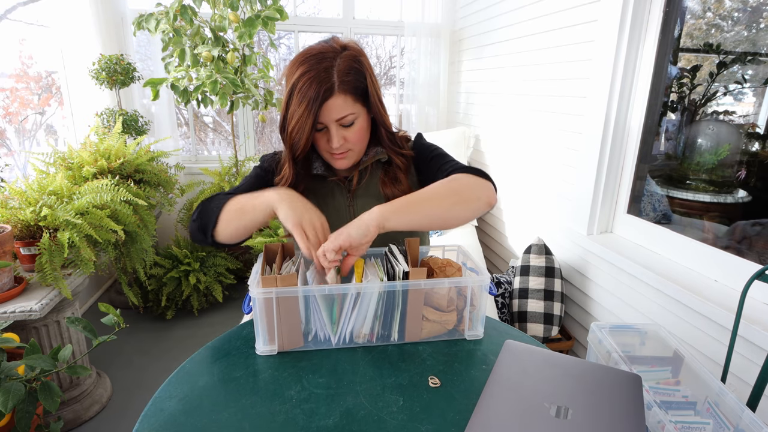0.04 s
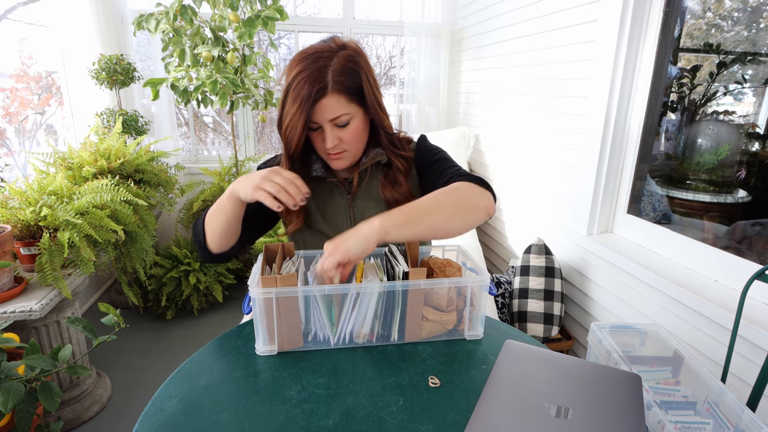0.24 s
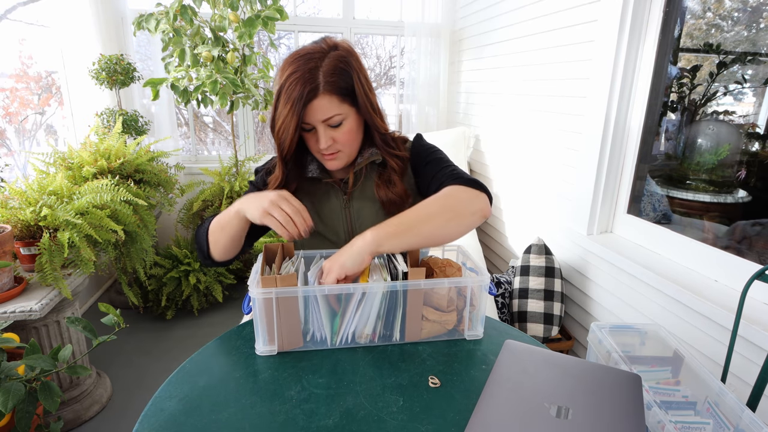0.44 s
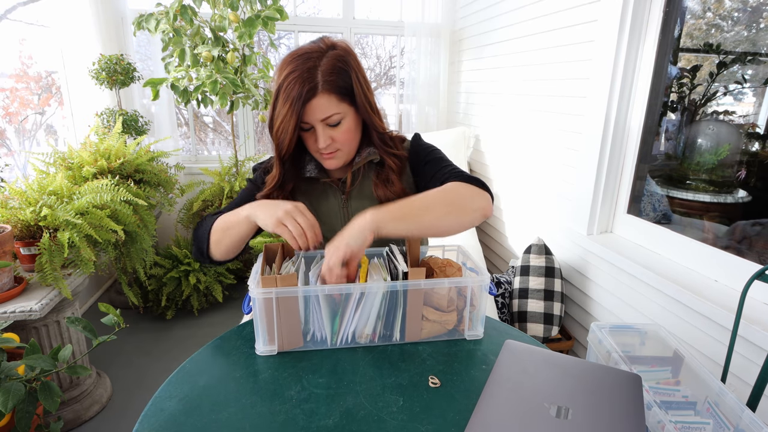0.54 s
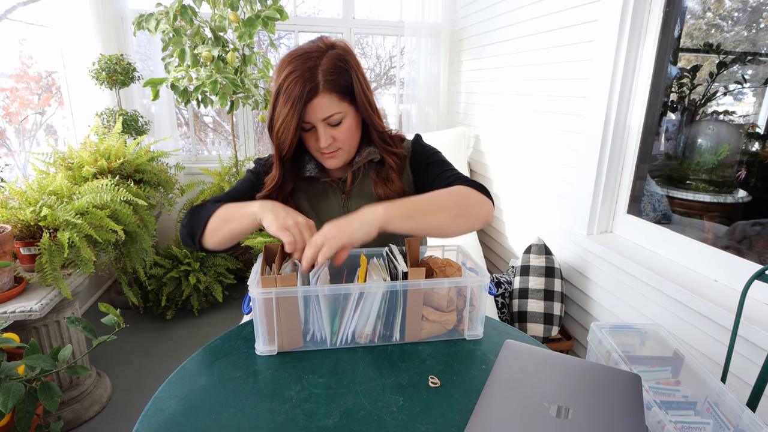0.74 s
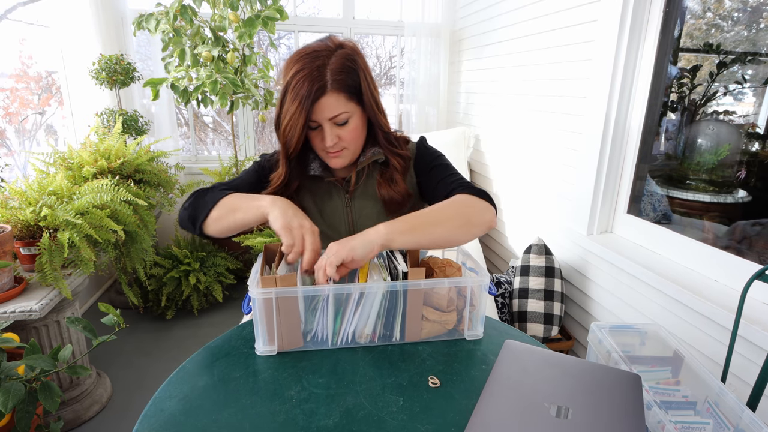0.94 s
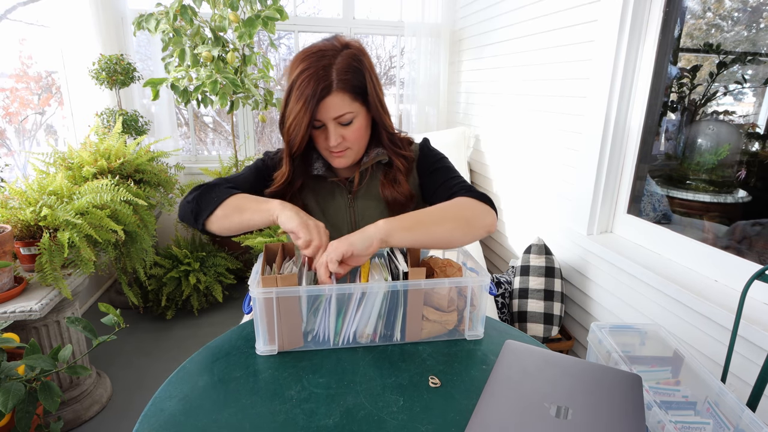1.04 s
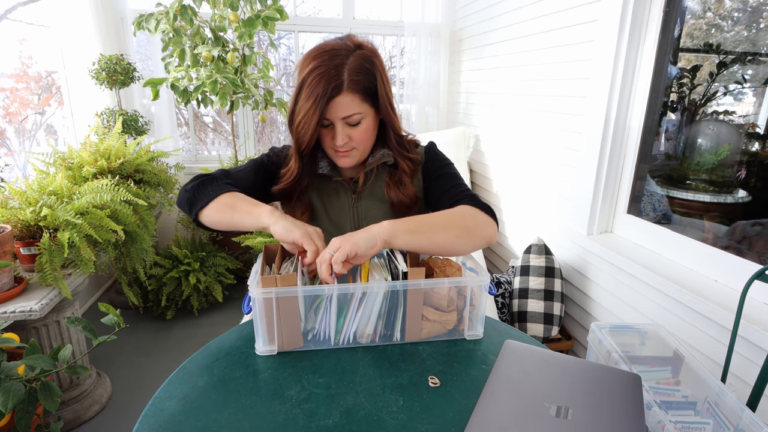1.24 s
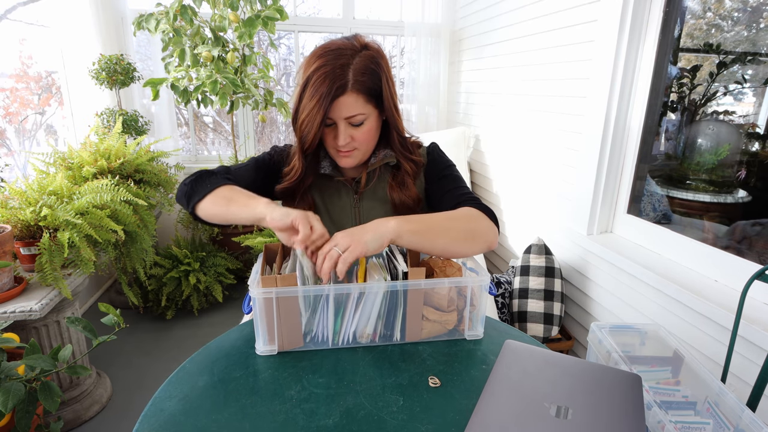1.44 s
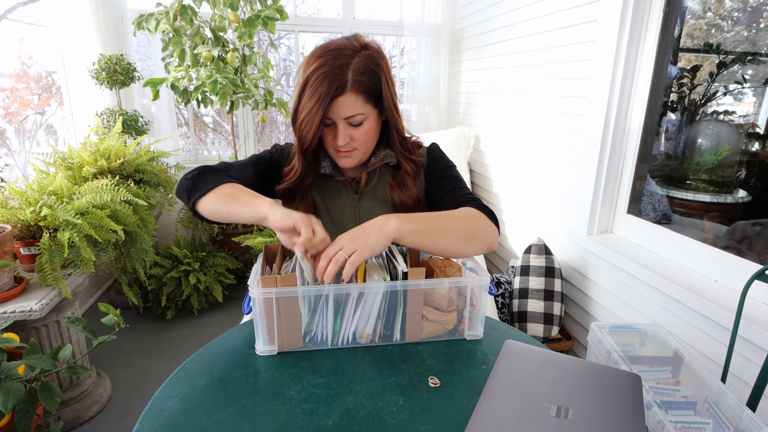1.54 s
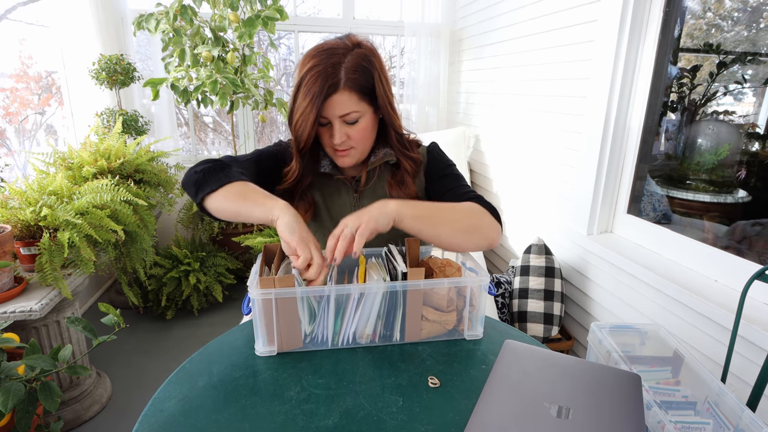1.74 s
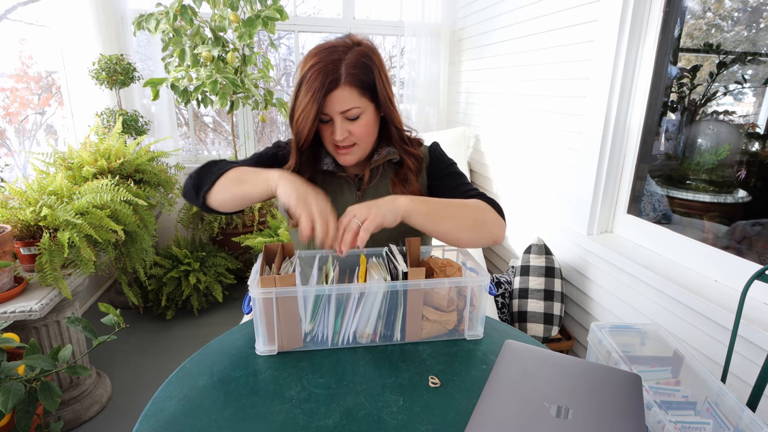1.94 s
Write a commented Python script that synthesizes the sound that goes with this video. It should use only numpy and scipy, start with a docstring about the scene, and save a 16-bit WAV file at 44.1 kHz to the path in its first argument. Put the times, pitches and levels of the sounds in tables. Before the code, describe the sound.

Paper seed packets rustle and tick as they are flicked through in a hollow plastic box

```python
"""Seed packets in a plastic box

Paper seed packets are shuffled and slid into a plastic storage box on a table in a small, bright room.
Packet edges snap past each other with dry ticks: a noise crack over damped edge and face tones.
Faces scrape in short strokes of unevenly gripped noise, and now and then one chatters at a resonance.
Packets bump the hollow box, which answers with a low, quickly damped knock; soft thuds reach the table.
A short room echo and quiet air lie behind it all."""
import sys
import numpy as np
from scipy import signal
from scipy.fft import rfft, irfft
from scipy.io import wavfile

SR = 44100
rng = np.random.default_rng(int(sys.argv[2]) if len(sys.argv) > 2 else 0)


def master(y):
    """Save y as 16-bit WAV."""
    cut = np.clip(np.atleast_2d(y).T, -1, 1)
    pcm = np.round(cut * 32767)  # scale
    wavfile.write(sys.argv[1], SR, pcm.astype(np.int16))


N = 88200  # two seconds of samples
HIT_SAMPLES = 4096  # length of one tick or knock

# Room: levels in dB, decays to -60 dB in seconds
AIR_DB = -55.5
ROOM_DB, ROOM_T60_S, ROOM_BUILD_S = -9.5, 0.4, 0.015
ROOM_TREBLE_DB, ROOM_TREBLE_T60_S, ROOM_SPLIT_HZ = -5.5, 0.15, 3400
TOP_HZ = 16000  # upper limit of the recorder

# Knocks: box walls and slap are in dB relative to the bump
KNOCK_T60_S, KNOCK_ATTACK_S, BOX_DB = 0.019, 0.00079, -7.5
SLAP_DB, SLAP_T60_S = -10, 0.013
# The bass cut sits at KNOCK_LOW_HZ for the reference pitch and moves with this power of the pitch
KNOCK_LOW_HZ, KNOCK_REFERENCE_HZ, KNOCK_LOW_LAW = 223, 500, 2.5

# Paper friction: catches over a smooth drag (share of the mean power), trims of each layer, grit in the hiss
CATCHES_PER_S, CATCH_SPREAD_DB, CATCH_LIMIT = 700, 5.5, 2.8
CATCH_S, SMOOTH_SHARE = 0.0019, 0.52
HISS_DB, RASP_DB, RUMBLE_DB = 1, 2, 0
GRIT_PER_S, GRIT_DB = 1900, -18

# Ticks
FLEX_T60_S, EDGE_T60_S, CRACK_T60_S = 0.0074, 0.0053, 0.012
FLEX_ATTACK_S, TICK_ATTACK_S, CRACK_HOLD_S = 0.00081, 0.000078, 0.00033


def undb(db):
    """Decibels to gain."""
    return 10 ** (np.asarray(db) / 20)


def unit(x):
    """Scale to an rms of one."""
    return x / np.sqrt(np.mean(x ** 2))


def burst(x, db):
    """Scale a short sound to the energy of one millisecond at the given rms level."""
    return x * undb(db) * np.sqrt(SR / 1000 / np.sum(x ** 2))


def fade(t60, size=HIT_SAMPLES):
    """Exponential decay that falls 60 dB in t60 seconds."""
    return np.exp(-np.log(1000) * np.arange(size) / SR / t60)


def onset(seconds, size=HIT_SAMPLES):
    """Exponential approach to one with the given time constant."""
    return 1 - np.exp(-np.arange(size) / SR / seconds)


def swell(peak, rise, fall):
    """A bell-shaped rise and fall around a moment, each side with its own width."""
    t = np.arange(N) / SR - peak
    return np.exp(-np.minimum((t / np.where(t < 0, rise, fall)) ** 2, 20))


def ring(hz, t60):
    """One damped mode."""
    return np.sin(2 * np.pi * hz * np.arange(HIT_SAMPLES) / SR) * fade(t60)


def coloured(x, colour):
    """Filter by a curve through (Hz, dB) points on a log-frequency axis, then set the rms to one."""
    hz, db = np.array(colour).T
    f = np.maximum(np.arange(len(x) // 2 + 1) * SR / len(x), 1)
    gain = undb(np.interp(np.log(f), np.log(hz), db))
    return unit(irfft(rfft(x) * gain, len(x)))


def noise(colour, size=N):
    """Coloured noise."""
    return coloured(rng.standard_normal(size), colour)


def add(out, start, x):
    """Mix a sound in at a time in seconds."""
    i = int(start * SR)
    out[i:i + len(x)] += x[:N - i]


def room_air():
    """The quiet air of the room: steady noise, strongest in the bass."""
    # spectrum of the air: frequency_hz, relative level_db
    air_colour = [(20, 5), (45, -8), (100, -2), (200, -3.5), (500, -11.5), (900, -14), (2000, -14.5),
                  (5000, -21.5), (16000, -28)]
    return undb(AIR_DB) * noise(air_colour)


def room(x):
    """Short diffuse echo of hard walls; the treble dies first."""
    scatter = rng.standard_normal(N)
    decay = fade(ROOM_T60_S, size=N)
    low = signal.sosfilt(signal.butter(1, ROOM_SPLIT_HZ, fs=SR, output="sos"), scatter)
    treble = undb(ROOM_TREBLE_DB) * (scatter - low) * fade(ROOM_TREBLE_T60_S, size=N)
    tail = onset(ROOM_BUILD_S, size=N) * (low * decay + treble)
    return undb(ROOM_DB) * signal.fftconvolve(x, tail)[:N] / np.sqrt(np.sum(decay ** 2))


def thuds():
    """Hands press the box against the table: low noise in soft swells."""
    # presses of the box on the table: peak_s, length_s, level_db
    presses = [(0.211, 0.0081, -34), (0.398, 0.061, -48.5), (0.906, 0.05, -56), (1.37, 0.024, -49),
               (1.783, 0.023, -51.5), (1.881, 0.049, -45.5)]
    # spectrum of a thud: frequency_hz, relative level_db
    thud_colour = [(25, -9), (45, -19), (90, -4), (170, 3), (260, -6.5), (500, -39), (1000, -64)]
    pressure = sum(undb(db) * swell(peak, length / 2, length / 2) for peak, length, db in presses)
    return noise(thud_colour) * pressure


def knocks():
    """A packet lands with a papery slap and a few low cycles, and rings the walls; low bumps keep more bass."""
    # packets bumping the box: start_s, level_db (energy in 1 ms, ahead of the bass cut), pitch_hz
    bumps = [(0.0633, -27.5, 450), (0.2074, -24, 389), (0.343, -12, 462), (0.371, -50, 460),
             (0.394, -24.5, 468), (0.406, -22, 410), (0.573, -29.5, 420), (0.732, -29, 510),
             (0.85, -24, 315), (0.901, -21, 433), (0.938, -26.5, 533), (1.167, -27, 467),
             (1.2925, -30, 465), (1.4304, -19, 376), (1.451, -22, 462), (1.5072, -7, 485),
             (1.704, -26, 343), (1.747, -23.5, 362), (1.756, -37, 350), (1.767, -25, 395),
             (1.867, -24, 388), (1.889, -24.5, 430), (1.981, -26, 455), (1.9952, -12, 509)]
    # ringing of the plastic box walls: frequency_hz, relative level_db, t60_s
    box_modes = [(309, 4, 0.059), (384, -12.5, 0.042), (527.5, -2, 0.085), (662, -4.5, 0.074),
                 (1069, -13, 0.12), (1660, -7, 0.022)]
    # spectrum of the papery slap: frequency_hz, relative level_db
    slap_colour = [(300, -2), (750, -22), (1050, -8), (1700, -11), (2600, -40), (6000, -27), (16000, -40)]
    out = np.zeros(N)
    walls = sum(undb(db) * ring(hz, t60) for hz, db, t60 in box_modes)
    for start, db, hz in bumps:
        bump = onset(KNOCK_ATTACK_S) * ring(hz, KNOCK_T60_S)
        slap = noise(slap_colour, size=HIT_SAMPLES) * fade(SLAP_T60_S)
        mix = unit(bump) + undb(BOX_DB) * unit(walls) + undb(SLAP_DB) * unit(slap)
        cut_hz = KNOCK_LOW_HZ * (hz / KNOCK_REFERENCE_HZ) ** KNOCK_LOW_LAW
        bass_cut = signal.butter(4, cut_hz, "high", fs=SR, output="sos")
        add(out, start, signal.sosfilt(bass_cut, burst(mix, db)))
    return out


def catches():
    """Uneven grip of paper fibres: many tiny catches over a smooth drag, as an amplitude curve."""
    caught = rng.random(N) < CATCHES_PER_S / SR
    size = np.minimum(rng.exponential(size=N), CATCH_LIMIT)
    strength = caught * undb(CATCH_SPREAD_DB * size) ** 2
    release = 1 - onset(CATCH_S / 2)  # power decays twice as fast as amplitude
    power = np.abs(signal.fftconvolve(strength, release)[:N])
    return np.sqrt(SMOOTH_SHARE + (1 - SMOOTH_SHARE) * power / np.mean(power))


def chatters():
    """Friction rings one resonance of a packet face for a moment."""
    # dragged packet faces: peak_s, rise_s, fall_s, resonance_hz, width_hz, level_db
    dragged_faces = [(0.1, 0.023, 0.053, 1410, 700, -52), (0.368, 0.019, 0.013, 3470, 900, -40),
                     (0.43, .02, 0.023, 2210, 900, -61), (1.311, 0.019, 0.033, 2440, 800, -41),
                     (1.552, 0.022, 0.025, 780, 347, -41), (1.923, 0.014, 0.019, 3270, 1600, -48)]
    out = np.zeros(N)
    drag = catches() * rng.standard_normal(N)
    for peak, rise, fall, hz, width, db in dragged_faces:
        face = signal.butter(2, [hz - width / 2, hz + width / 2], "band", fs=SR, output="sos")
        out += undb(db) * swell(peak, rise, fall) * unit(signal.sosfilt(face, drag))
    return out


def slides():
    """Each stroke swells and dies; the same catches drive gritty hiss, rasp of the faces and box rumble."""
    # paper sliding on paper: peak_s, rise_s, fall_s, then hiss_db, rasp_db, rumble_db ahead of the trims
    strokes = [(0.02, 0.092, 0.059, -50.5, -51.5, -51), (0.081, 0.024, 0.044, -48.5, -46.5, -47),
               (0.23, 0.028, 0.034, -57.5, -65, -52), (0.29, 0.024, 0.015, -52, -49, -41.5),
               (0.342, 0.032, 0.053, -40, -40, -46), (0.386, 0.017, 0.05, -51.5, -41, -37),
               (0.565, 0.045, 0.039, -47.5, -47.5, -48), (0.614, 0.0061, 0.015, -50.5, -48, -45.5),
               (0.699, 0.014, 0.0094, -57, -60, -49.5), (0.765, 0.042, 0.043, -56, -52, -47),
               (0.842, 0.036, 0.062, -45.5, -44.5, -38.5), (0.926, 0.01, 0.023, -62, -43.5, -39.5),
               (0.981, 0.049, 0.046, -50, -49.5, -44), (1.111, 0.052, 0.037, -52.5, -49, -45.5),
               (1.17, 0.075, 0.066, -53.5, -50, -53), (1.313, 0.047, 0.027, -47.5, -48, -43),
               (1.374, 0.043, 0.035, -48, -44.5, -46.5), (1.448, 0.037, 0.02, -40.5, -44, -48.5),
               (1.482, 0.013, 0.014, -35.5, -41.5, -37.5), (1.526, 0.039, 0.027, -44.5, -44.5, -45.5),
               (1.634, 0.068, 0.035, -44.5, -46, -41.5), (1.701, 0.075, 0.025, -49, -48.5, -44.5),
               (1.758, 0.034, 0.038, -46, -43.5, -38.5), (1.885, 0.047, 0.081, -52, -50, -53.5)]
    # spectra of the three layers: frequency_hz, relative level_db
    hiss_colour = [(1500, -48), (3000, -6), (4300, 1), (6500, 1.5), (9500, 0), (12000, -1.5), (14000, -8.5),
                   (16000, -11.5)]
    rasp_colour = [(500, -1), (850, -7), (1200, 1), (1900, 0.5), (2450, -4.5), (3300, -3.5), (4500, -8),
                   (8000, -25)]
    rumble_colour = [(40, -29), (100, -15), (190, -5), (300, -4.5), (400, 3), (520, 4), (680, -3.5),
                     (900, -23), (1800, -48)]
    power = 0
    for peak, rise, fall, *levels_db in strokes:
        power = power + (undb(levels_db)[:, None] * swell(peak, rise, fall)) ** 2
    hiss_level, rasp_level, rumble_level = np.sqrt(power)
    grit = unit((rng.random(N) < GRIT_PER_S / SR) * rng.standard_normal(N))
    fibres = coloured(rng.standard_normal(N) + undb(GRIT_DB) * grit, hiss_colour)
    hiss = hiss_level * undb(HISS_DB) * fibres
    rasp = rasp_level * undb(RASP_DB) * noise(rasp_colour)
    rumble = rumble_level * undb(RUMBLE_DB) * noise(rumble_colour)
    return catches() * (hiss + rasp + rumble)


def ticks():
    """An edge slips free: a crack, the ring of the stiff edge and the lower flex of the packet face."""
    # paper edges snapping: start_s, flex_hz, flex_db, edge_hz, edge_db, crack_db (levels as energy in 1 ms)
    snaps = [(0.0635,1510,-34.5,3340,-42,-44), (0.081,1600,-51,5500,-41,-34),
             (0.1485,1130,-40,2910,-45,-41.5), (0.2636,1400,-40,3470,-40,-45),
             (0.3212,1520,-31.5,4860,-32,-30), (0.3455,910,-32,5580,-37,-24),
             (0.3901,1830,-29,3670,-37,-37), (0.4198,2100,-30,3660,-21.5,-24.5),
             (0.5405,1700,-26,4080,-26,-29), (0.5617,1590,-30.5,3520,-42,-51),
             (0.5754,1400,-26.5,3330,-32,-36), (0.718,1810,-77,3850,-49,-45),
             (0.7539,1693,-19.5,2940,-30,-32.5), (0.8476,1850,-30,2950,-37,-32),
             (0.9251,1840,-27.5,3340,-29.5,-33), (0.939,1060,-31.5,3300,-49,-42),
             (0.993,1890,-31.5,2720,-42.5,-45), (1.011,1460,-36,2970,-48,-49),
             (1.103,1780,-32,4200,-35,-34), (1.117,1500,-36,3830,-33,-45), (1.13,1420,-29.5,3060,-30,-16),
             (1.1655,1300,-34.5,4500,-43,-35), (1.194,1870,-38.5,3520,-59,-47),
             (1.283,1680,-40,3000,-42,-41), (1.2902,2040,-20.5,4160,-59,-14.5),
             (1.358,1860,-30,2620,-59,-53), (1.4317,1660,-29.5,2980,-48,-50),
             (1.5066,1100,-29,2680,-49,-47), (1.6445,1200,-32.5,5270,-25.5,-25),
             (1.6822,2000,-51,4300,-40,-29), (1.705,1320,-32.5,2900,-42,-42),
             (1.7477,1950,-31.5,4860,-38,-32), (1.7741,1600,-25.5,3270,-35.5,-32),
             (1.8658,1780,-35,2980,-33.5,-31), (1.8774,2030,-29,5000,-22,-27.5),
             (1.9106,1600,-24.5,5500,-32.5,-21.5), (1.979,1770,-38.5,2740,-48,-54)]
    # flexing modes of a packet face: ratio to flex_hz, relative level_db
    flex_modes = [(.68, -6.5), (0.999, 3), (1.23, -14)]
    # spectrum of the crack: frequency_hz, relative level_db
    crack_colour = [(400, -16), (1200, 4.5), (2500, 4.5), (4500, 5.5), (6700, 3), (9700, 0.5), (11000, -1),
                    (13500, -4), (16000, -18)]
    out = np.zeros(N)
    decay = fade(CRACK_T60_S)
    held_level = np.interp(CRACK_HOLD_S * SR, np.arange(HIT_SAMPLES), decay)
    crack_shape = np.minimum(decay, held_level)  # flat at first, then decaying
    for start, flex_hz, flex_db, edge_hz, edge_db, crack_db in snaps:
        face = sum(undb(db) * ring(ratio * flex_hz, FLEX_T60_S) for ratio, db in flex_modes)
        flex = burst(onset(FLEX_ATTACK_S) * face, flex_db)
        edge = burst(onset(TICK_ATTACK_S) * ring(edge_hz, EDGE_T60_S), edge_db)
        crack = burst(noise(crack_colour, size=HIT_SAMPLES) * crack_shape, crack_db)
        add(out, start, flex - edge + crack)  # the edge starts opposite to the face
    return out


def scene():
    """Packets and box, their echo and the quiet air of the room, in one channel."""
    near = thuds() + knocks() + chatters() + slides() + ticks()
    return (near + room(near) + room_air())[None]


def record(dry):
    """The recorder cuts the top steeply."""
    top_cut = signal.ellip(10, .2, 80, TOP_HZ, fs=SR, output="sos")
    return signal.sosfilt(top_cut, dry)


dry = scene()
out = record(dry)
master(out)
```